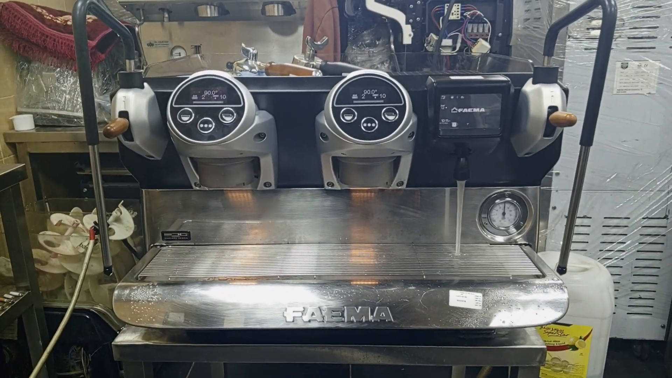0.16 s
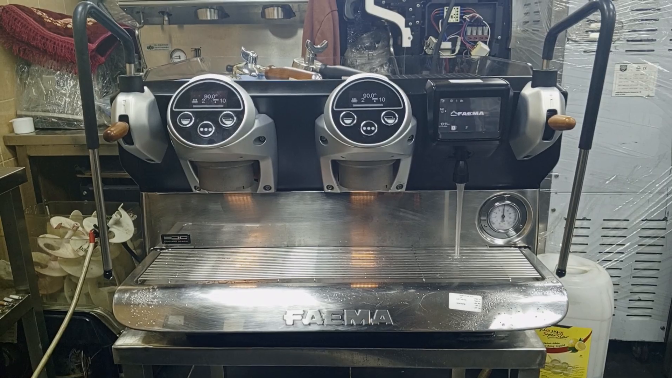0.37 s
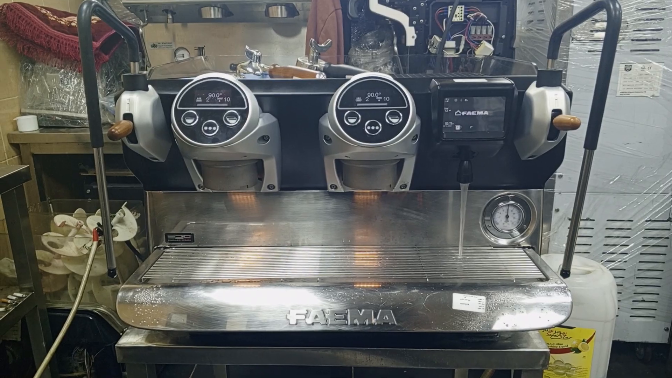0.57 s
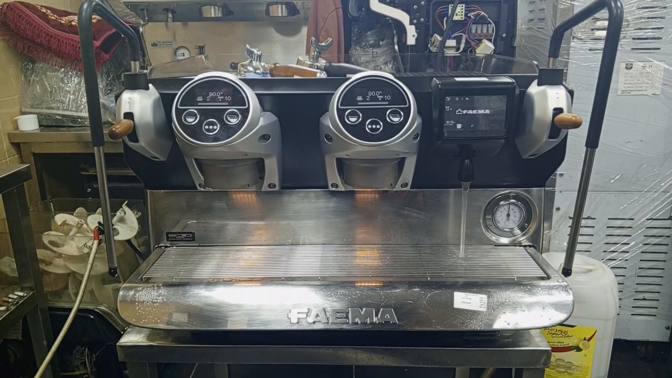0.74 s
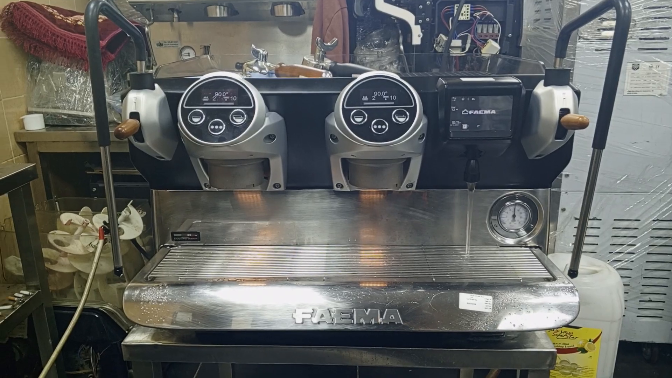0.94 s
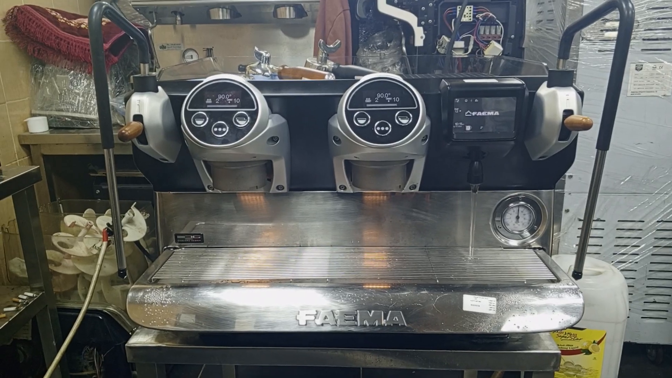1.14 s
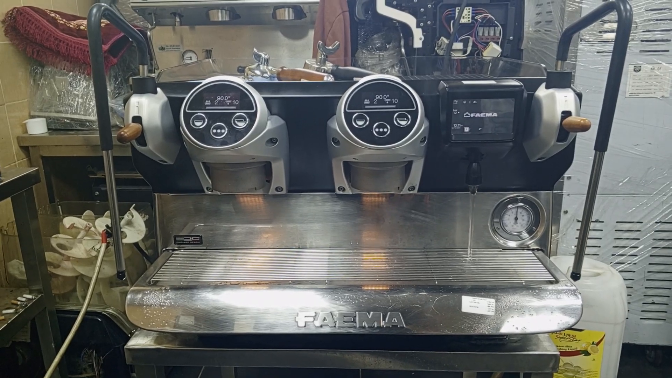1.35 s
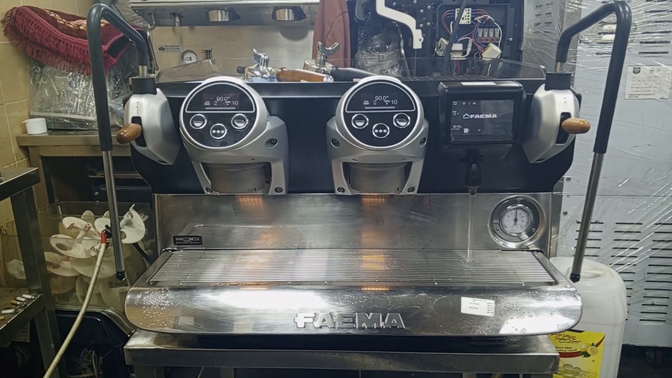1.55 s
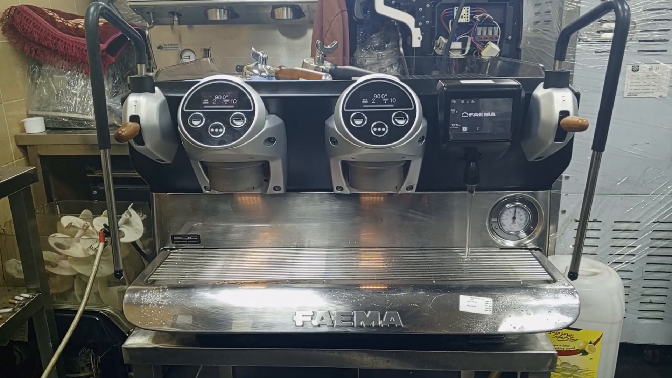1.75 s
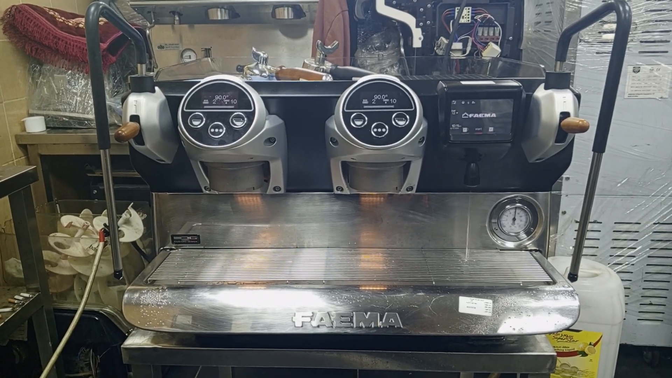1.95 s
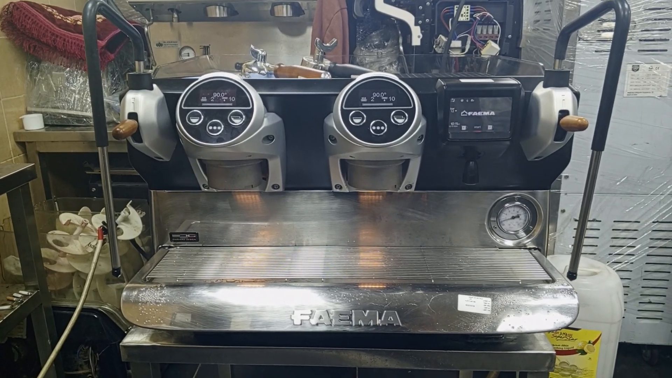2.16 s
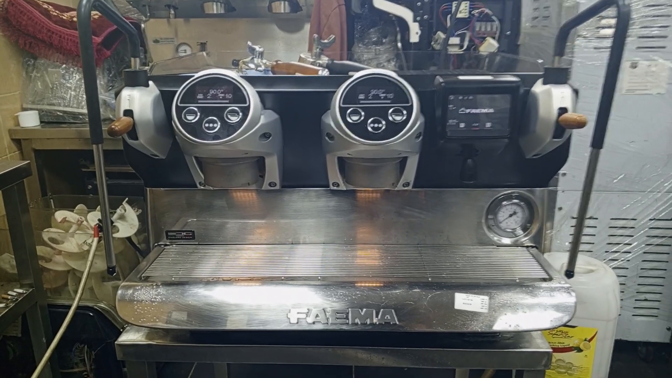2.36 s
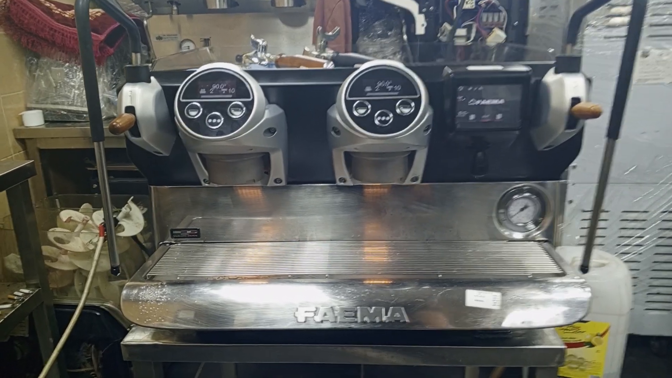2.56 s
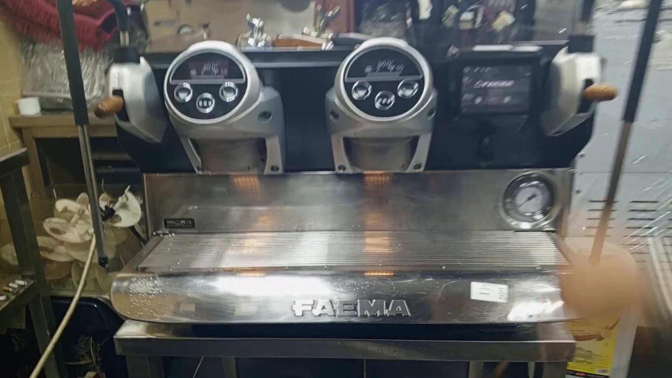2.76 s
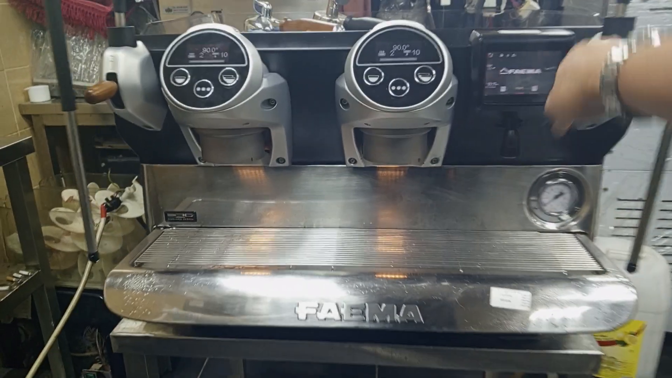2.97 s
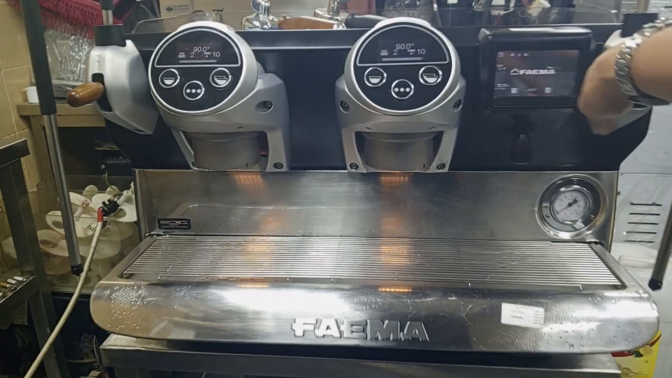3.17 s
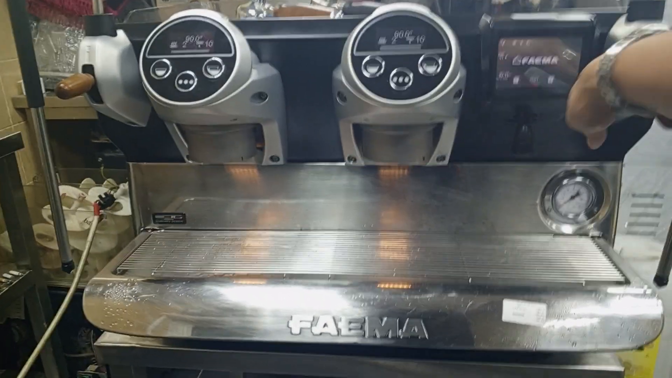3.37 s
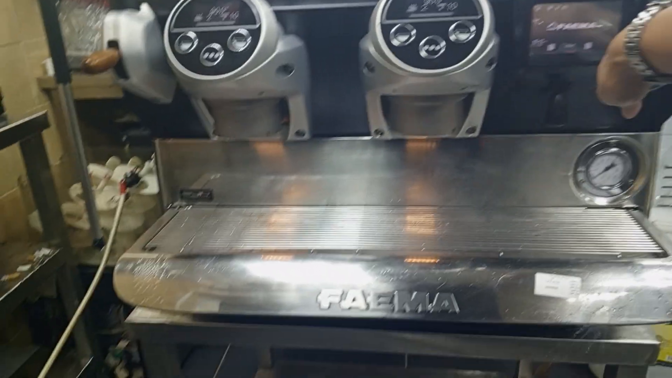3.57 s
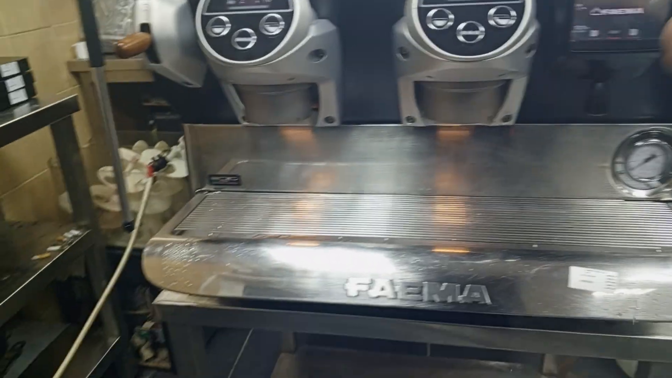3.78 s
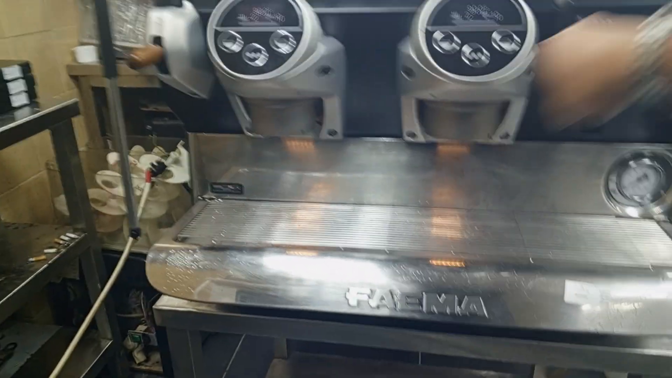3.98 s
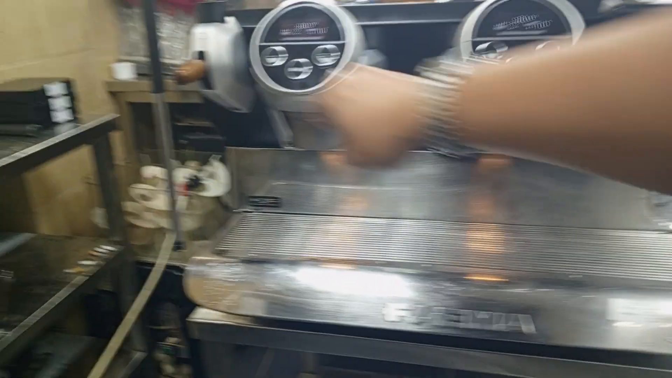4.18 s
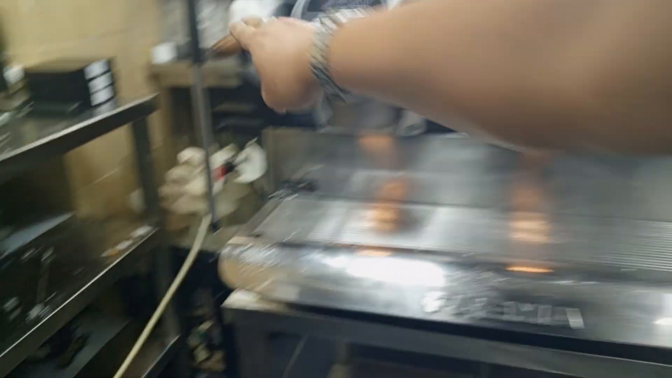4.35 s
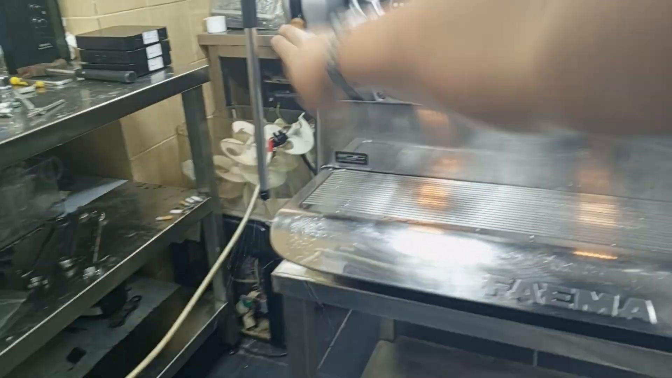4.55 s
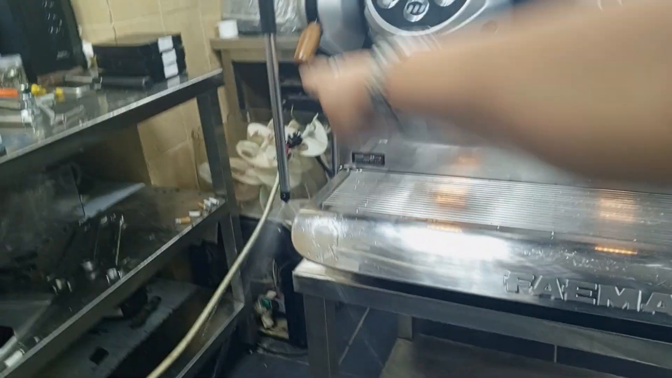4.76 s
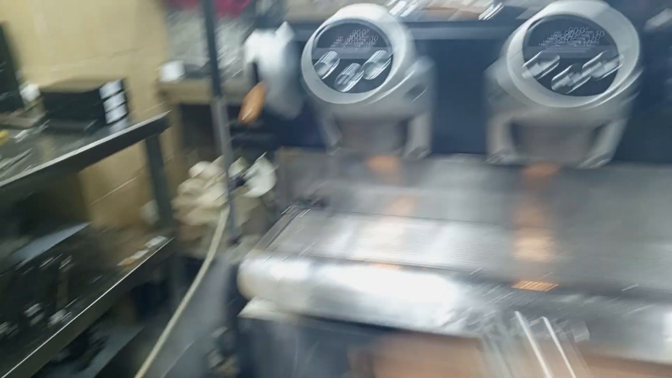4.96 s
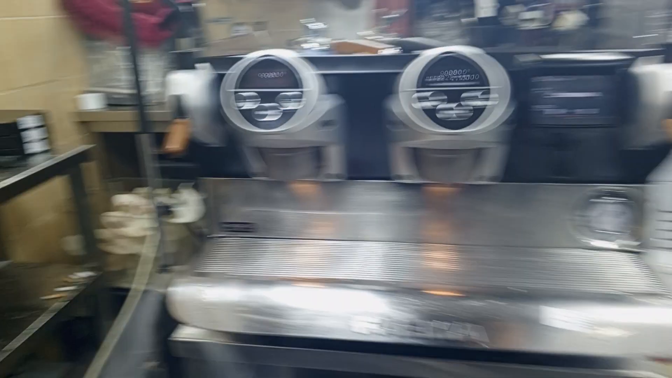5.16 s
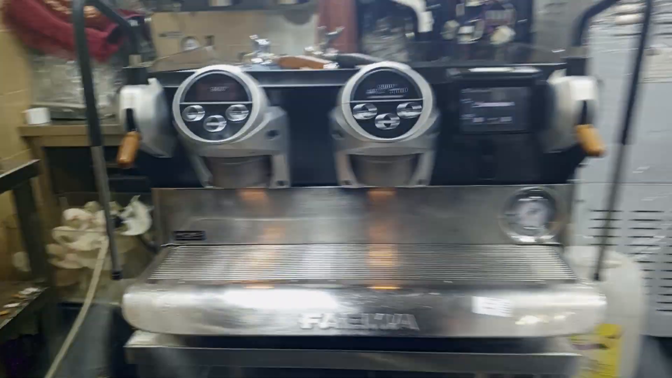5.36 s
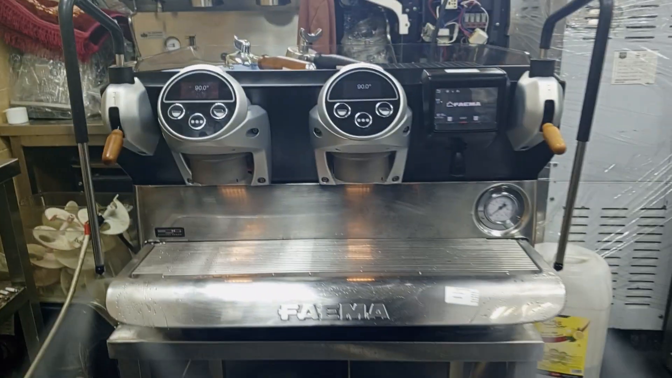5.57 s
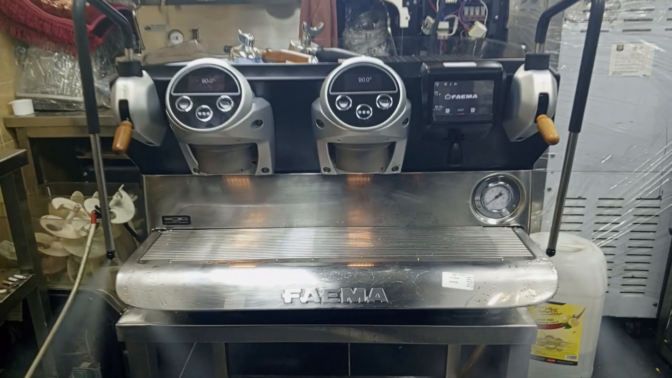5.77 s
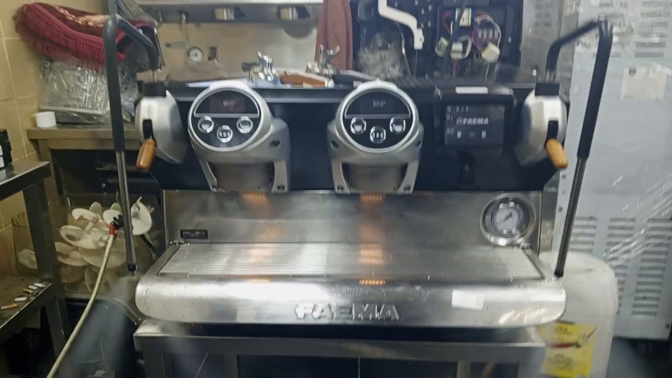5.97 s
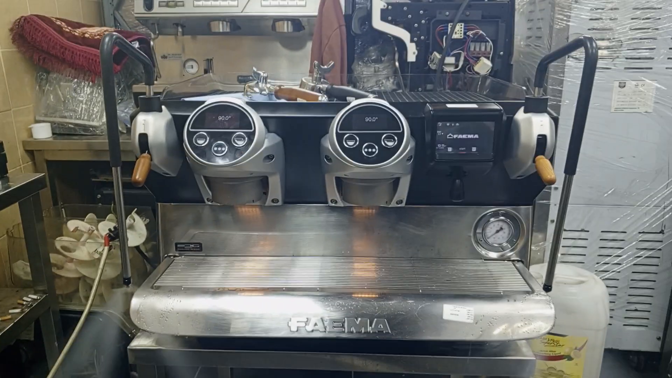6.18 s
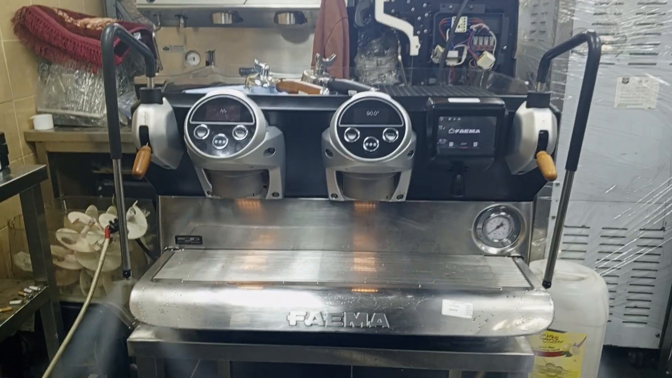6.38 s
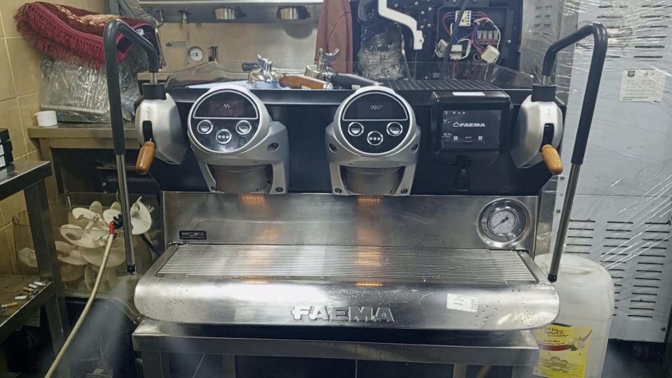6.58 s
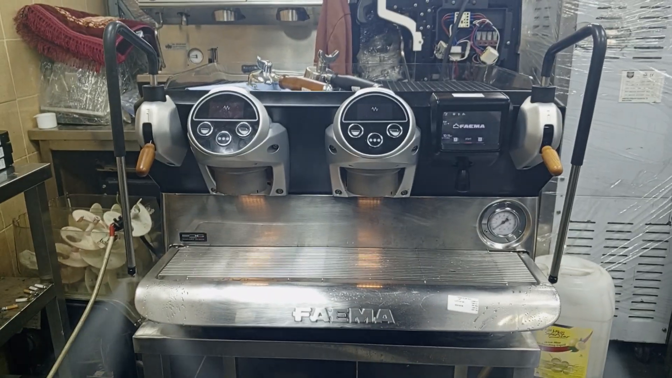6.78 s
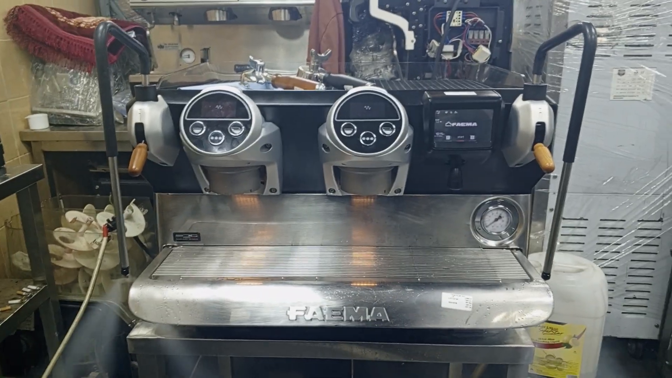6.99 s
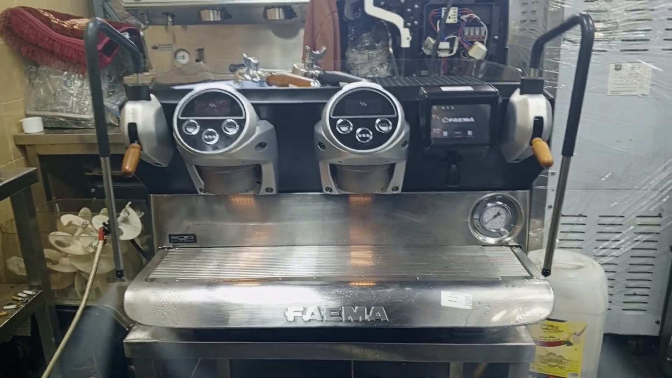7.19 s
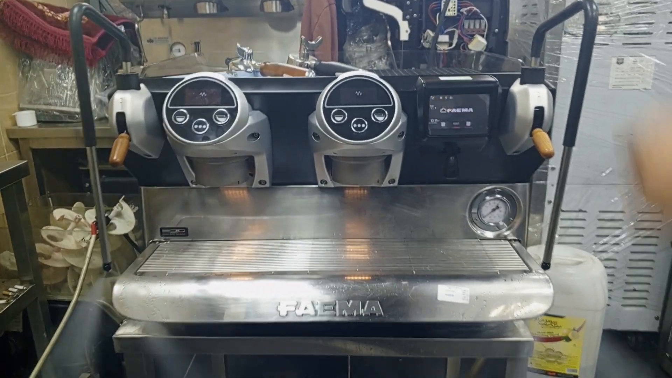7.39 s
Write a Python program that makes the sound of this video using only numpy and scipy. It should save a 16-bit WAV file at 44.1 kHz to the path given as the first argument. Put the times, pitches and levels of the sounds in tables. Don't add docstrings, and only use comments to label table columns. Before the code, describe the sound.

In a workshop with a low air rumble and distant fans, a close hand-held mono microphone hears an espresso machine pump whirring with a watery valve hiss. A light knock and soft bump come at 0.4 s; a thin valve whistle colours it from 0.7 to 1.6 s. A hard double knock lands at 1.6 s, with thuds after, and the pump dies away from about 1.9 s. Quiet cloth rubs remain, then a tiny high lens motor chirps and whines from 2.7 to 3.1 s. Sleeves brush at 3.2 s; lever clicks and small ticks cluster from 3.4 s. At 3.66 s a sharp click releases a loud steam jet, with a brief low pipe tone near 3.9 s. It dulls around 4.6 s with a bump, the second wand opens at 4.8 s, and a bright, dense, faintly sputtering roar holds, very slightly easing, until 7.4 s.

```python
import sys
import numpy as np
from scipy import signal
from scipy.fft import rfft, irfft, next_fast_len
from scipy.io import wavfile
from scipy.ndimage import uniform_filter1d, map_coordinates

SR = 44100
rng = np.random.default_rng(int(sys.argv[2]) if len(sys.argv) > 2 else 0)


def transcribe(signal):
    frames = np.atleast_2d(signal).T
    limited = np.clip(frames, -1, 1)
    pcm = np.round(limited * 32767).astype(np.int16)
    wavfile.write(sys.argv[1], SR, pcm)


def convert_level_to_amplitude(level_db):
    exponent = np.asarray(level_db, float) / 20
    return 10 ** exponent


N = 327663
T = np.arange(N) / SR


def unit(x):
    return x / np.sqrt(np.mean(x ** 2) + 1e-20)


def since(s):
    return np.maximum(T - s, 0)


def gate(start, end, fade):
    return np.clip(np.minimum(T - start, end - T) / fade, 0, 1)


def along(points, hz):
    f, v = np.transpose(points)
    return np.interp(np.log(hz + 1), np.log(f + 1), v)


def curves(rows):
    s, *cols = np.transpose(rows)
    return [np.interp(T, s, c) for c in cols]


def wobble(rate):
    coarse = T[::32]
    knots = rng.standard_normal(int(N * rate / SR) + 4)
    return np.interp(T, coarse, map_coordinates(knots, [coarse * rate]))


def filtered(x, response):
    m = next_fast_len(len(x) + 8192)
    return irfft(rfft(x, m) * response(np.fft.rfftfreq(m, 1 / SR)), m)[:len(x)]


def shape(points):
    return lambda hz: convert_level_to_amplitude(along(points, hz))


def body(modes):
    def response(f):
        total = 0
        for k, (centre, width, db) in enumerate(modes):
            total = total + (-1) ** k * convert_level_to_amplitude(db) * 1j * f * width / (centre * centre - f * f + 1j * f * width)
        return total
    return response


def field(z, bins, frames):
    over_hz = uniform_filter1d(rng.standard_normal(z.shape), size=bins, axis=0)
    return unit(uniform_filter1d(over_hz, size=frames, axis=1))


def rush(response, patchy_db, streak_db=0):
    z = signal.stft(rng.standard_normal(N), nperseg=1024)[2]
    streaks = field(z, bins=2, frames=70)
    streaks = unit(streaks - uniform_filter1d(streaks, size=12, axis=0))
    gain_db = patchy_db * field(z, bins=10, frames=6) + streak_db * streaks
    noise = signal.istft(z * convert_level_to_amplitude(gain_db), nperseg=1024)[1][:N]
    return unit(filtered(noise, response))


def tones(lines, drift_hz, waver_db):
    out = np.zeros(N)
    for hz, db in lines:
        level = np.sqrt(2) * convert_level_to_amplitude(db + waver_db * wobble(7))
        out += level * np.sin(2 * np.pi * np.cumsum(hz + drift_hz * wobble(12)) / SR)
    return out


def jet(spectrum, tip):
    turbulence = rush(shape(spectrum), patchy_db=.5, streak_db=2.5)
    return unit(turbulence + convert_level_to_amplitude(-8) * rush(body(tip), patchy_db=1.55, streak_db=2.5))


# frequency in Hz, level in dB per Hz.
RIGHT_JET = [(880, -36), (1500, -20.5), (1880, -16.5), (2100, -16.5), (2710, -9.5), (3110, -8),
             (3900, -9.5), (4300, -6), (5140, -2.5), (5560, -8.5), (6200, -6.5), (6710, -11.5),
             (10000, -0.5), (11300, -3), (15800, -25.5)]
LEFT_JET = [(880, -35), (1500, -24.5), (1940, -21), (2430, -11.5), (2850, -9.5), (3470, -2), (4020, -5),
            (4700, -0.5), (7040, -7), (8170, -5.5), (9850, -1), (10900, 1.5), (13100, -11.5),
            (15200, -17.5), (15800, -24)]
# frequency in Hz, width in Hz, level in dB.
RIGHT_TIP = [(3930, 150, -4.5), (4610, 83, -5), (5170, 160, -2), (5840, 77, -1.5), (6320, 120, -13),
             (3430, 120, -11)]
LEFT_TIP = [(1306, 50, -16.5), (2460, 84, -8), (2687, 85, -9), (3655, 250, -4.5), (4700, 280, -1),
            (5730, 97, -3.5), (7620, 180, -7.5), (9950, 270, -2.5)]
# frequency in Hz, level in dB per Hz.
ROAR = [(35, -49), (60, -16), (139, -16), (206, -6.5), (237, -6.5), (614, -8), (996, -4), (1920, -4),
        (2500, -4.5), (3250, -27), (5500, -120)]
# frequency in Hz, width in Hz, level in dB.
TRAY = [(721, 22, -2), (1255, 45, -1.5), (1323, 22, -0.5)]
# opening in seconds, pressure build-up in seconds, full level in dB.
VALVES = [
    (3.655, 0.14, -18.5),
    (4.8, 0.089, -19),
]
LEFT_TAKES_OVER = (4.76, 5.05)
# time in seconds, turn from 0 (facing) to 1 (away).
MIC_TURN = [
    (3.66, 0),
    (3.75, 0.54),
    (4.0, .1),
    (4.45, 0.54),
    (4.68, 1),
    (5.05, 0.6),
    (5.75, 0.22),
    (7.43, 0.33),
]


def steam():
    leak = .2
    flows = [convert_level_to_amplitude(db) * (T > s) * (1 - (1 - leak) * np.exp(-since(s) / build)) for s, build, db in VALVES]
    sag_db_per_s = 0.46
    flow = np.hypot(*flows) * convert_level_to_amplitude(-sag_db_per_s * since(LEFT_TAKES_OVER[1]))
    turn = uniform_filter1d(curves(MIC_TURN)[0], size=3000)
    left = np.interp(T, LEFT_TAKES_OVER, [0, 1])

    sputter = convert_level_to_amplitude(.2 * wobble(9) + .4 * wobble(60) + .6 * wobble(250))
    both = np.sqrt(1 - left) * jet(RIGHT_JET, RIGHT_TIP) + np.sqrt(left) * jet(LEFT_JET, LEFT_TIP)
    jets = unit(sputter * both)
    nozzle = filtered(jets, lambda f: np.exp(-((f - 5100) / 1350) ** 4))
    facing_db, turned_db = 1.5, -4
    jets = jets + (convert_level_to_amplitude(facing_db + (turned_db - facing_db) * turn) - 1) * nozzle

    roar_db = -19.5 + 3 * turn + 0.37 * wobble(6)
    roar = convert_level_to_amplitude(roar_db) * rush(shape(ROAR), patchy_db=1.13, streak_db=2.0)
    tray = convert_level_to_amplitude(-29.5) * rush(body(TRAY), patchy_db=1.5)

    dry_db, wet_db = -48.5, -41
    pipe_db = np.interp(T, [3.7, 3.94, 4.04], [dry_db, wet_db, dry_db])
    pipe_noise = rush(body([(412, 17, 3), (500, 35, -3), (281, 35, -9)]), patchy_db=1.0)
    pipe_tone = tones([(408, -3.5)], drift_hz=3, waver_db=2.5)
    pipe = gate(3.7, 5.1, .06) * convert_level_to_amplitude(pipe_db) * (0.7 * pipe_noise + pipe_tone)
    whistle = tones([(14755, -55)], drift_hz=5, waver_db=2) * left
    onset = np.clip(since(VALVES[0][0]) / .006, 0, 1)
    return onset * (flow * (jets + roar + tray) + pipe + whistle)


# frequency in Hz, level in dB per Hz.
PUMP_HISS = [(300, -11.5), (900, -4.5), (2600, -6.5), (4500, -6.5), (6900, -14.5), (9200, -6.5), (10900, 0),
             (12300, -11.5), (13500, -21), (15800, -28)]
# frequency in Hz, width in Hz, level in dB.
PUMP_CASE = [(330, 31, -1.5), (737, 42, -6.5), (1295, 61, -3), (1870, 136, -2.5), (3660, 225, 0),
             (4760, 140, -7), (5560, 100, -5.5), (6490, 80, -8), (7340, 120, -11), (9160, 150, -6)]
# frequency in Hz, level in dB.
PUMP_TONES = [(349, -54.5), (745, -60), (1078, -65), (1104, -55.5), (1809, -67), (10820, -62)]
# start in seconds, end in seconds, fade in seconds, level in dB.
VALVE_WHISTLE = (.72, 1.6, .08, -51.5)


def pump():
    ease_db = -9.5 * since(1.59)
    stop_s, coast_s = 1.93, .1
    hiss_t60_s, whirr_t60_s = .75, 0.59
    hiss_db = -42 + ease_db - 60 * since(stop_s) / hiss_t60_s
    load_db = -4 * np.exp(-T / 0.48)
    whirr_db = -41.5 + load_db + ease_db - 60 * since(stop_s + coast_s) / whirr_t60_s

    hiss = convert_level_to_amplitude(hiss_db + 0.55 * wobble(22)) * rush(shape(PUMP_HISS), patchy_db=1.2, streak_db=2)
    case = convert_level_to_amplitude(-2.5) * rush(body(PUMP_CASE), patchy_db=1, streak_db=1)
    motor = convert_level_to_amplitude(42.5) * tones(PUMP_TONES, drift_hz=1.18, waver_db=1.5)
    start, end, fade, db = VALVE_WHISTLE
    whistle = rush(body([(1800, 45, 3), (1930, 40, -7)]), patchy_db=3.5)
    whistle = gate(start, end, fade) * convert_level_to_amplitude(db + 3 * wobble(5.1)) * whistle
    return hiss + convert_level_to_amplitude(whirr_db) * (case + motor) + whistle


# time in seconds, peak in dB, brightness in dB.
KNOCKS = [
    (0.4388, -24.5, 3),
    (1.6076, -14.5, 2),
    (1.6194, -19.5, -3),
]
CLICKS = [
    (3.371, -15.5, -2),
    (3.3774, -24, 2),
    (3.3977, -18, 5),
    (3.6578, -13, 2),
    (3.692, -15, .1),
]
TICKS = [
    (2.6249, -48, .1),
    (3.5329, -31, 3),
    (3.5544, -27, 0.3),
    (3.56, -17, 2),
    (3.571, -18, 1),
    (3.6054, -29, 0.3),
]
# frequency in Hz, width in Hz, level in dB.
PANEL = [(1640, 150, -5), (3450, 400, -0.5), (4510, 350, 3.5), (6040, 340, -3), (8040, 470, -5),
         (10400, 700, -4), (12200, 700, -7), (14100, 1200, -12)]
LEVER = [(2690, 340, -6.5), (4070, 830, -7.5), (6140, 610, -1), (8100, 360, -2.5), (9500, 610, 2),
         (10750, 850, 3), (12200, 1400, -6.5), (15000, 1500, -19)]


def clicks():
    out = np.zeros((2, N + SR))
    t = np.arange(SR // 4) / SR
    # contacts, resonances, t60 in seconds
    for rows, modes, t60 in [(KNOCKS, PANEL, .075), (CLICKS, LEVER, 0.054), (TICKS, LEVER, 0.022)]:
        for s, db, bright_db in rows:
            colour = lambda f: body(modes)(f) * ((f + 500) / 6000) ** (bright_db / 6)
            burst = unit(filtered(rng.standard_normal(len(t)), colour))
            crack = convert_level_to_amplitude(db - 7) * (1 - np.exp(-t / 0.00044)) * burst * convert_level_to_amplitude(-60 * t / t60)
            bare = unit(filtered(np.arange(len(t)) == 64, colour)) * np.sqrt(np.mean(crack ** 2))
            out[:, round(s * SR):][:, :len(t)] += [crack, bare]
    return out[:, :N]


# frequency in Hz, t60 in seconds.
TAIL = [(200, 0.6), (2000, 0.75), (6000, 0.43), (14000, 0.23)]


def echo(x):
    hz, t, z = signal.stft(rng.standard_normal(SR // 2), SR, nperseg=256)
    decay = convert_level_to_amplitude(-60 * t / along(TAIL, hz)[:, None])
    tail = signal.istft(z * decay, SR, nperseg=256)[1]
    return signal.fftconvolve(np.pad(x, (400, 0)), tail / np.linalg.norm(tail))[:N]


def swells(rows, response, pivot_hz):
    low = rush(lambda f: response(f) / (1 + (f / pivot_hz) ** 4), patchy_db=1)
    high = rush(lambda f: response(f) / (1 + (pivot_hz / (f + 1)) ** 4), patchy_db=1)
    out = np.zeros(N)
    for s, rise, t60, db, bright_db in rows:
        near = slice(round(s * SR) - SR // 4, round(s * SR) + SR)
        t = T[near] - s
        level = np.exp(-(np.minimum(t, 0) / rise) ** 2) * convert_level_to_amplitude(-60 * np.maximum(t, 0) / t60)
        tilted = low[near] * convert_level_to_amplitude(-bright_db) + high[near] * convert_level_to_amplitude(bright_db)
        out[near] += convert_level_to_amplitude(db - 5.5) * level * tilted
    return out


# peak in seconds, rise in seconds, t60 in seconds, level in dB, brightness in dB.
RUBS = [(.445, .008, 0.27, -41, -6), (1.973, .007, 0.18, -39.5, 6), (1.985, 0.026, .25, -36.5, -1),
        (2.12, .04, .6, -57, -3), (2.33, .069, .8, -49.5, -3), (2.5, .04, .43, -57, 1),
        (3.13, 0.0066, .3, -37.5, .5), (3.16, .01, .25, -47, 0), (3.212, .01, .55, -34, -1.5),
        (3.34, .011, 0.14, -53.5, -15.5), (3.53, .02, 0.36, -53, -4), (3.58, 0.026, 0.37, -43.5, -2),
        (3.645, .008, .2, -47, 5)]
# frequency in Hz, level in dB per Hz.
CLOTH = [(180, -40), (400, -19), (1500, -10.5), (3500, -6), (5000, -6), (7000, -13.5), (10500, -9),
         (12500, -19), (15800, -39)]


def rubs():
    return swells(RUBS, shape(CLOTH), pivot_hz=6830)


# peak in seconds, t60 in seconds, level in dB, brightness in dB.
BUMPS = [(.41, .32, -42.5, 4.5), (.45, .4, -37, 2), (1.63, .3, -36, 5), (1.83, .45, -37.5, -1.5),
         (2.0, .3, -37, .5), (2.63, .09, -48, -6), (3.39, 0.45, -34, 1.5), (3.432, 0.28, -37, -8.5),
         (3.485, .12, -47, -6), (3.72, 0.61, -37.5, -1), (4.635, 0.47, -30.5, 0.5)]
# frequency in Hz, width in Hz, level in dB.
BENCH = [(188.6, 28, 6), (326, 88, 1.5), (524, 126, -4), (728, 59, -6), (973, 110, -9.5),
         (1290, 150, -15.5), (1655, 130, -15)]


def bumps():
    rise_share = 0.057
    rows = [(s, rise_share * t60, t60, db, bright_db) for s, t60, db, bright_db in BUMPS]
    return swells(rows, body(BENCH), pivot_hz=454)


# time in seconds, peak in dB.
THUDS = [(0.44, -33), (1.645, -29.5), (1.835, -29), (3.431, -29), (4.625, -33)]


def thuds():
    t = np.arange(SR // 4) / SR
    push = filtered(t / .0008 * np.exp(-t / 0.001), body(BENCH[:2]))
    out = np.zeros(N + SR)
    for s, db in THUDS:
        out[round(s * SR):][:len(t)] -= convert_level_to_amplitude(db) * push / np.abs(push).max()
    return out[:N]


# start in seconds, length in seconds, start in Hz, sweep in Hz per second, level in dB.
CHIRPS = [(2.672, .045, 10900, 98000, -69), (2.688, .05, 9500, 70000, -62), (2.722, .03, 13700, 75000, -74)]
# time in seconds, pitch in Hz.
GLIDE = [(2.74, 10500), (2.775, 11100), (2.81, 12200), (2.855, 13000), (2.9, 13400), (2.96, 12650),
         (3.0, 13200), (3.03, 12450), (3.07, 10800)]
# pitch ratio, level in dB.
WHINE_SIDES = [(1, 0), (.872, -8), (1.115, -13), (.78, -13)]
# frequency in Hz, width in Hz, lift in dB.
HOUSING = (11300, 400, 10)


def whine():
    runs = [(s, s + length, hz + hz_per_s * since(s), db, WHINE_SIDES[:1]) for s, length, hz, hz_per_s, db in CHIRPS]
    glide_hz = uniform_filter1d(curves(GLIDE)[0], size=800)
    runs.append((GLIDE[0][0], GLIDE[-1][0], glide_hz, -65, WHINE_SIDES))
    housing_hz, width_hz, lift_db = HOUSING
    out = np.zeros(N)
    for start, end, hz, db, partials in runs:
        on = (T > start) & (T < end)
        turns = np.cumsum((hz + 40 * wobble(300))[on]) / SR
        sag_db = 12 * since(start)[on]
        for ratio, side_db in partials:
            lift = lift_db * np.exp(-((ratio * hz[on] - housing_hz) / width_hz) ** 2)
            level_db = db + side_db + lift - sag_db + 2.5 * wobble(60)[on]
            out[on] += gate(start, end, .012)[on] * convert_level_to_amplitude(level_db) * np.sin(2 * np.pi * ratio * turns)
    haze = rush(body([(11300, 1500, 0), (14300, 1500, -8)]), patchy_db=2.2, streak_db=2.2)
    return out + convert_level_to_amplitude(-65) * gate(2.65, 3.1, .06) * filtered(haze, lambda f: f > 8500)


# frequency in Hz, level in dB per Hz.
ROOM = [(18, -70), (50, -28), (130, -3), (240, -6.5), (420, -5), (650, -11.5), (1300, -18.5), (2300, -23),
        (4500, -25.5), (7000, -35.5), (10500, -31), (13000, -44), (15800, -55)]
# frequency in Hz, level in dB.
HUM = [(156.1, -60), (242.2, -56.5), (1082, -65), (1141, -67.5), (1319, -67.5), (1378, -67)]


def workshop():
    air = convert_level_to_amplitude(-47.0 + 0.65 * wobble(3.16)) * rush(shape(ROOM), patchy_db=0.85, streak_db=1.5)
    return air + tones(HUM, drift_hz=.8, waver_db=1.3)


def scene():
    hits, bare_hits = clicks()
    hands = rubs() + bumps() + thuds()
    mono = steam() + pump() + hits + convert_level_to_amplitude(-5.5) * echo(bare_hits) + hands + whine() + workshop()
    return np.array([mono, mono])


# middle in seconds, middle in Hz.
FILLS = [(2.915, 12100), (3.03, 4750), (4.355, 14600), (4.588, 11800), (4.588, 6300), (5.332, 9100),
         (5.332, 5050), (5.61, 10450), (5.935, 11150), (6.028, 11150), (6.145, 11150), (6.352, 8400)]


def fills(x):
    out = np.zeros(N)
    window = np.kaiser(2048, 4 * np.pi) ** .5
    for s, hz in FILLS:
        band = lambda f: np.abs(f - hz) < 1600 / 2
        at = round(s * SR) - 1024
        noise = unit(filtered(rng.standard_normal(2048), band))
        out[at:][:2048] += convert_level_to_amplitude(-2) * np.std(filtered(x[at:][:2048], band)) * noise * window
    return out


def band_limit(x):
    return signal.sosfilt(signal.butter(12, 16530, fs=SR, output="sos"), x)


def record(dry):
    soft = dry[0] / (1 + np.abs(dry[0] / .8) ** 6) ** (1 / 6)
    kept = filtered(soft, lambda hz: hz < 15770)
    side = fills(kept)
    return band_limit(np.array([kept + side, kept - side]))


dry = scene()
out = record(dry)
transcribe(out)
```